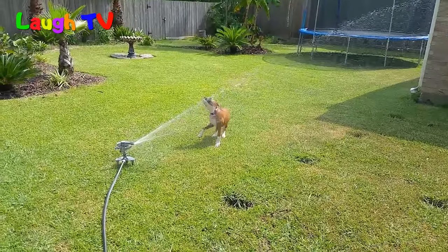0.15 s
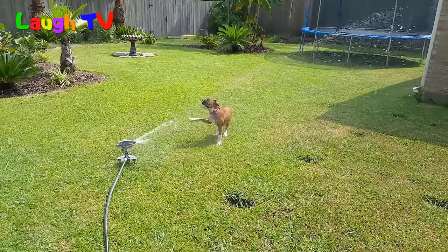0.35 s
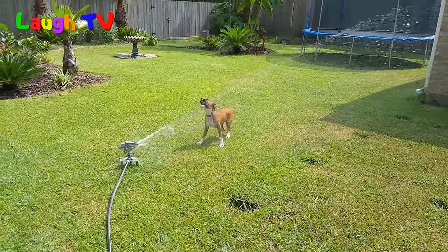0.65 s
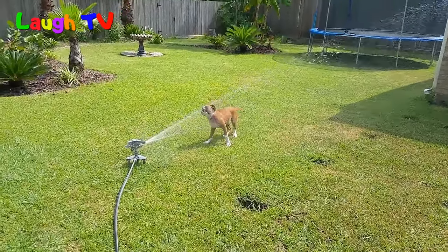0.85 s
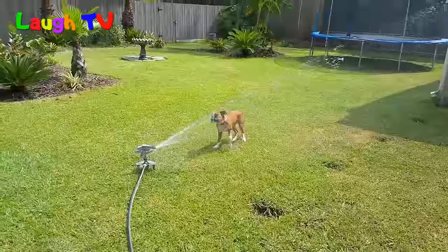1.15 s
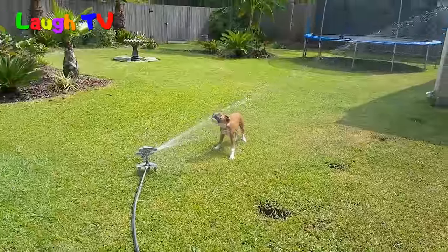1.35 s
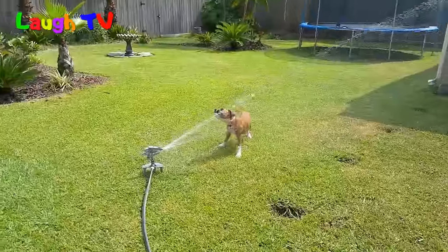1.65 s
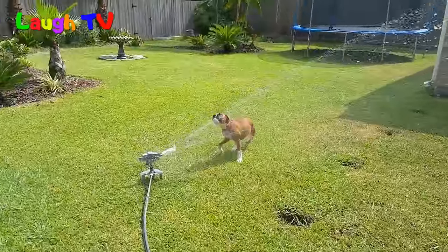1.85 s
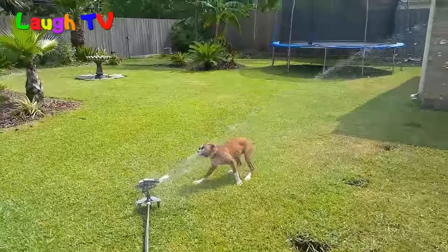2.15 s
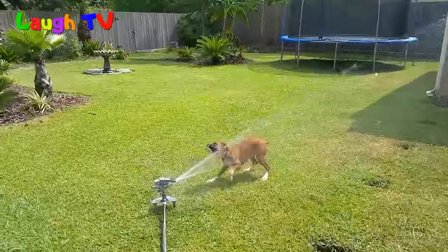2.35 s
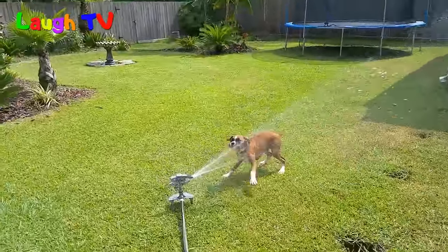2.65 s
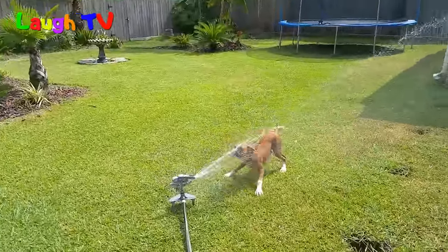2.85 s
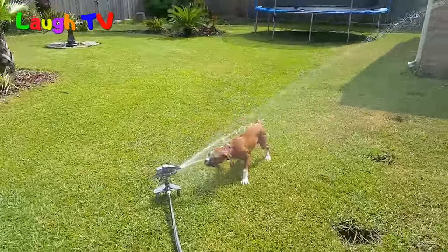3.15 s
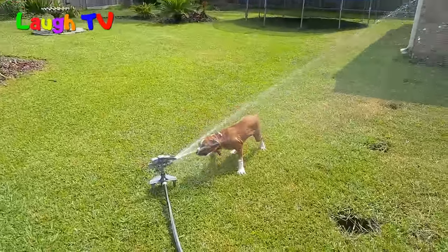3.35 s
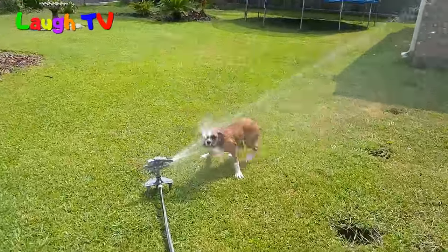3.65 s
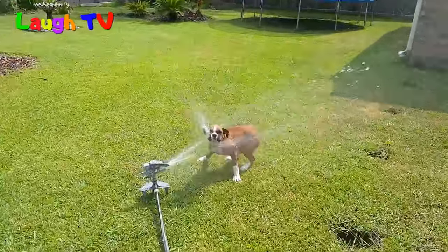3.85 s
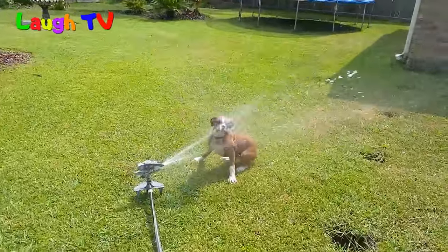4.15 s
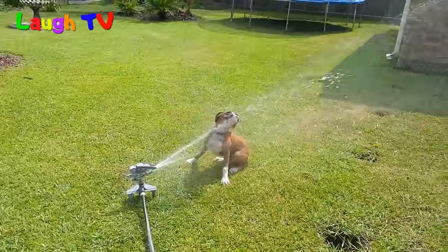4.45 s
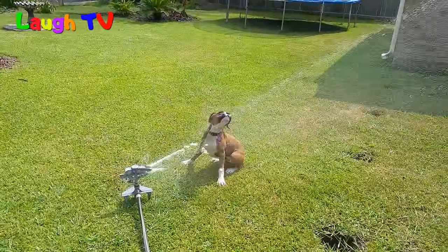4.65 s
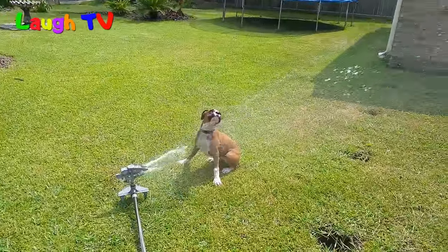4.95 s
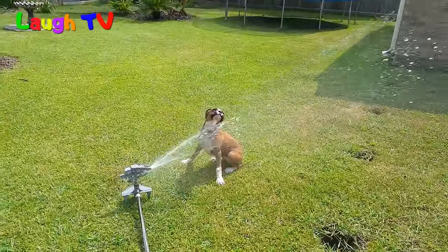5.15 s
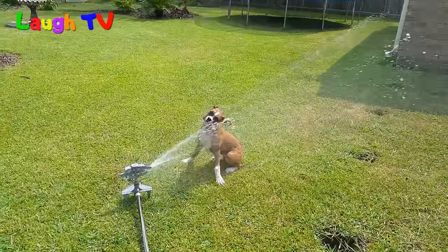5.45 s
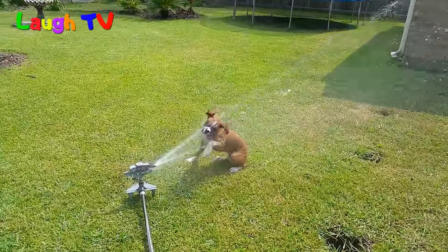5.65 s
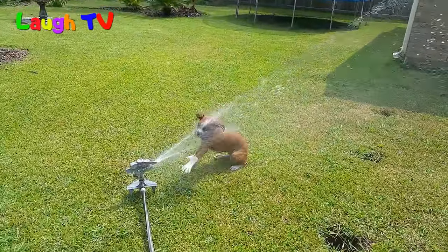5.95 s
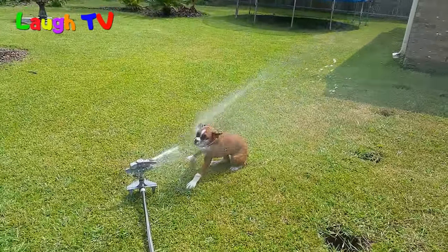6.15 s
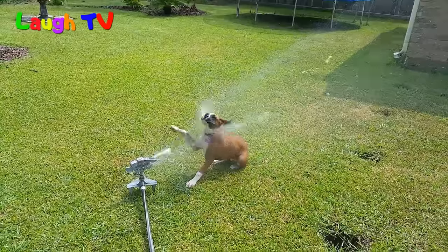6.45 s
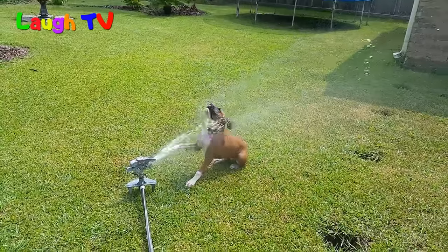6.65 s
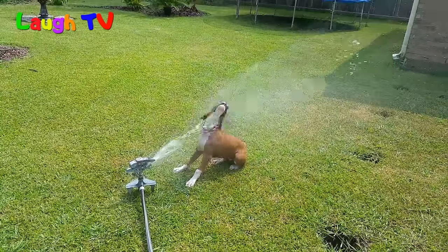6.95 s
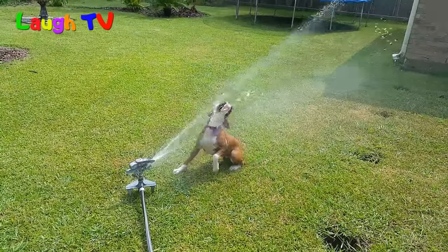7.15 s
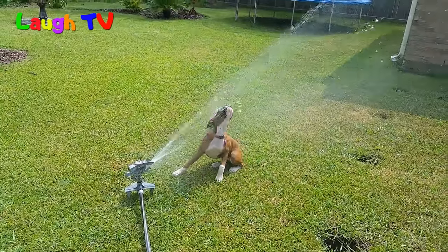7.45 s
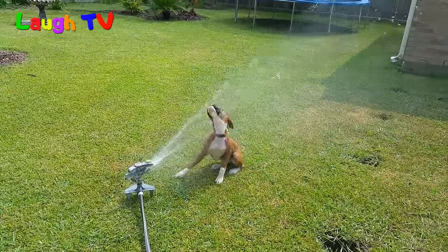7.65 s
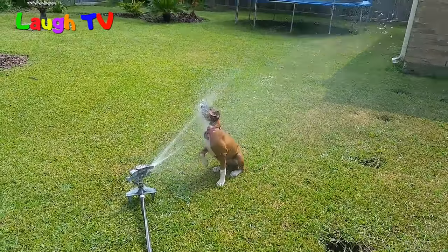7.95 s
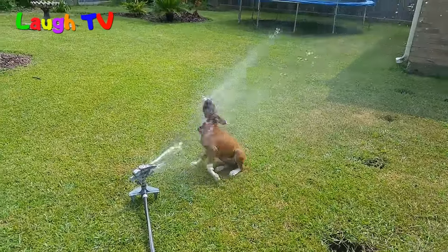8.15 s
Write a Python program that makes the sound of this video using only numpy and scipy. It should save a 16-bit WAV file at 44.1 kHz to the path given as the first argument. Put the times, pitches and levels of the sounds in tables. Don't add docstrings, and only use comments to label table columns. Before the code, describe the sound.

Steady sprinkler hiss with slow, regular bursts of coarse spray and a slight metallic ring, heard outdoors as the microphone moves nearer. One hard water drop pops against its right side. A dog biting the jet breaks it into sizzling drops with tiny wet snaps and gulps. In the second half the ticking becomes quick and softer over thicker, brighter hiss, above low rumble and weak wavering hum.

```python
import sys
import numpy as np
from scipy import signal
from scipy.fft import rfft, irfft
from scipy.io import wavfile
from scipy.ndimage import uniform_filter1d, map_coordinates

SR = 44100
rng = np.random.default_rng(int(sys.argv[2]) if len(sys.argv) > 2 else 0)


def generate_wav(sig):
    pcm = np.round(np.clip(np.atleast_2d(sig).T, -1, 1) * 32767).astype(np.int16)
    wavfile.write(sys.argv[1], SR, pcm)


def nominal_scale(level):
    x = np.asarray(level, float) / 20
    return 10 ** x


N = 365588
T = np.arange(N) / SR
HZ = np.maximum(np.fft.rfftfreq(N, 1 / SR), 1)

# columns start_s [s], pressure_step [full scale]
DROP_HITS = [
    (2.23877, .125),
    (2.2406, .95),
]


def unit(x):
    return x / np.sqrt(np.mean(x ** 2))


def colour(x, points):
    hz, db = np.transpose(points)
    gain_db = np.interp(np.log(HZ), np.log(hz), db, -70, -70)
    return unit(irfft(rfft(x) * nominal_scale(gain_db), N))


def ring(x, hz, width_hz):
    resonance = (1 + 1.3j * (HZ - hz) / width_hz) ** 2
    return unit(irfft(rfft(x) / resonance, N))


def walk(rate):
    hold = int(SR / rate)
    stairs = np.repeat(rng.standard_normal(N // hold + 1), hold)
    return 1.283 * uniform_filter1d(uniform_filter1d(stairs, hold), hold)[:N]


def noise_pair():
    return rng.standard_normal((2, N))


def droplets(spread_db, grain_db):
    drops = noise_pair() * nominal_scale(spread_db * rng.exponential(size=(2, N)))
    return drops * nominal_scale(grain_db * walk(400))


def curves(table):
    s, *columns = np.transpose(table)
    return [np.interp(T, s, column) for column in columns]


def bump(middle_s, half_s):
    return np.exp(-((T - middle_s) / half_s) ** 2)


def strokes():
    # columns stay_s [s in the jet], spray_db [dB]
    slow_swings = [(0.041, -34), (0.047, -33.5), (0.041, -32), (.035, -31), (.036, -31.5), (0.034, -30),
                   (.037, -30.5), (0.035, -28.5), (0.031, -29), (0.029, -29), (0.031, -27.5), (0.03, -29),
                   (.023, -27.5), (0.028, -26), (0.03, -27.5), (0.033, -27)]
    # columns peak_s [s], spray_db [dB]
    quick_strokes = [(4.979, -34), (5.128, -33.5), (5.28, -34), (5.43, -32.5), (5.58, -34.5), (5.736, -34),
                     (5.884, -35.5), (6.039, -37.5), (6.188, -34), (6.341, -33), (6.494, -33),
                     (6.649, -35.5), (6.799, -36), (6.952, -37), (7.105, -37), (7.249, -42), (7.412, -36.5),
                     (7.566, -38), (7.721, -34.5), (7.875, -35), (8.029, -39), (8.18, -37)]
    first_s, period_s = 0.1935, 0.30735
    quick_width_s = 0.029
    slow_mist_db, quick_mist_db = 3.5, -0.1
    slow, quick, mist, mask = np.zeros((4, N))

    for k, (stay, db) in enumerate(slow_swings):
        t = T - first_s - k * period_s
        core = np.interp(t, [-.003, .005, stay - .006, stay + 0.007], [0.00026, 0.83, 0.57, 0])
        approach = 0.06 * np.exp(np.minimum(t, 0) / 0.034)
        dripping = 0.077 * np.exp(-np.maximum(t - stay, 0) / 0.045)
        skirt = np.where(t < 0, approach, dripping)
        exit_flick = 0.038 * np.exp(-((t - stay - .025) / 0.006) ** 2)
        slow += nominal_scale(2 * db) * (core + skirt + exit_flick)
        mist_core = np.interp(t, [-.014, .006, stay - .004, stay + 0.028], [0.0017, 0.95, 0.62, 0])
        mist += nominal_scale(2 * slow_mist_db) * (mist_core + skirt)

    for peak_s, db in quick_strokes:
        t = T - peak_s
        quick += nominal_scale(2 * db) * np.interp(t / quick_width_s, [-.75, 0, .65], [0, 1.2, 0]) ** 1.4
        mist += nominal_scale(2 * quick_mist_db) * np.interp(t, [-0.055, -0.015, 0.013, 0.014], [0, 1, 1, 0])
        mask += np.interp(t, [.015, .024, .04], [0, 1, 0])
        mask += 0.23 * np.interp(t, [-.038, -.03, -.026], [0, 1, 0])
    return np.sqrt(slow), np.sqrt(quick), np.sqrt(mist), mask


def jet_hiss(close_db, mask):
    hiss_colour = [(1500, -24), (2500, -1), (3600, -3), (4500, -4), (5000, -1), (6000, -4), (6800, -5),
                   (8000, -21), (10000, -31)]
    level_db = -45.5 + 1.1 * close_db - 0.68 * mask + 0.51 * walk(12)
    return colour(droplets(1.2, 0.62), hiss_colour) * nominal_scale(level_db)


def jet_sizzle(broken_db, mask, slow, quick):
    sizzle_colour = [(4800, -19), (5600, -7), (6000, -3), (6130, -4), (6190, 1.5), (6250, -2), (6500, -1),
                     (7000, -6.5), (7800, -23)]
    steady = nominal_scale(-56 + broken_db - 3.5 * mask + 0.9 * walk(13))
    flow = np.hypot(steady, nominal_scale(-2.6) * quick + nominal_scale(-9.0) * slow)
    return colour(droplets(1.3, 1.8), sizzle_colour) * flow


def fine_mist(close_db, arm_mist):
    mist_colour = [(5000, -15), (7500, -0.5), (9000, -0.5), (11000, 1), (13000, -0.5), (14500, -2),
                   (16000, -2.5)]
    flow = np.hypot(nominal_scale(0.44 * walk(10)), nominal_scale(-0.5) * arm_mist)
    return colour(droplets(1.0, 0.91), mist_colour) * nominal_scale(-43 + close_db) * flow


def falling_patter(close_db):
    patter_colour = [(250, -12.5), (500, -3), (900, 0), (1500, 1), (2200, -0.5), (3000, -4.5), (4500, 1.5)]
    coat_db = 3 * bump(4.63, 0.23)
    level_db = -48 + 0.47 * close_db + coat_db + 1.1 * walk(8)
    return colour(droplets(1.75, 1.0), patter_colour) * nominal_scale(level_db)


def tearing_spray(slow, quick):
    spray_colour = [(1200, -24), (2200, -12), (3000, -11), (3600, -8.5), (4200, -3.5), (5000, 1.5),
                    (6000, -1), (6600, -4), (7500, -9.5), (9000, -9.5), (12000, -14)]
    surge = nominal_scale(0.16 + 1.46 * walk(90))
    return colour(droplets(2.2, 0.67), spray_colour) * np.hypot(slow, nominal_scale(-3) * quick) * surge


def ringing_head(head_db, slow, quick):
    body_hz, body_width_hz = 1648, 55
    flow_db, knock_db = -62.5, -24
    head = ring(noise_pair(), body_hz, body_width_hz) * nominal_scale(head_db)
    knocks = nominal_scale(knock_db) * uniform_filter1d(slow + quick, 900)
    return head * np.hypot(nominal_scale(flow_db + 2.7 * walk(7)), knocks)


def lawn(pair, delay_s):
    echo_gain, echo_top_hz = .36, 1700
    dull = signal.sosfilt(signal.butter(2, echo_top_hz, fs=SR, output="sos"), pair)
    return pair + echo_gain * np.array([np.interp(T - delay_s, T, wave) for wave in dull])


def sprinkler():
    # columns time_s [s], closeness_db [dB], jet broken up by dog and sweep broken_db [dB]
    steady_water = [(0, -0.5, 2), (.8, -.5, -2), (1.25, 0.4, -1), (2.1, 0, -4), (2.45, 0.5, 7),
                    (3.3, 0.5, 3.5), (3.75, 2.5, 7.5), (3.83, 5, 12.5), (4.35, 4, 6), (4.76, 1.8, 7),
                    (5.03, 3.5, 13.5), (5.8, 3.5, 12.5), (6.55, 4, 13.5), (6.74, 5.5, 14.5), (7.15, 3, 12),
                    (7.6, 3, 9.5), (8.29, 3.5, 8)]
    # columns time_s [s], echo_ms [ms], head_ring_db [dB]
    walking_closer = [
        (0, 1.87, 0),
        (1.0, 1.94, -2),
        (1.6, 2.24, 3.5),
        (8.3, 2.243, -8),
    ]
    close_db, broken_db = curves(steady_water)
    echo_ms, head_db = curves(walking_closer)
    slow, quick, arm_mist, mask = strokes()
    jet = jet_hiss(close_db, mask) + jet_sizzle(broken_db, mask, slow, quick)
    mist = fine_mist(close_db, arm_mist)
    near_grass = falling_patter(close_db) + tearing_spray(slow, quick)
    return jet + mist + lawn(near_grass, echo_ms / 1000) + ringing_head(head_db, slow, quick)


def dog():
    snaps = [(2.436, 0.042, 280, 200, -44), (2.705, 0.02, 8250, 250, -34.5), (2.79, .012, 6700, 200, -55),
             (3.82, .03, 860, 90, -46), (4.279, 0.018, 1100, 400, -46), (4.402, 0.028, 1300, 120, -46),
             (6.554, 0.06, 820, 150, -51), (6.711, 0.079, 823, 130, -42.5), (6.785, .02, 4500, 150, -46),
             (7.03, 0.054, 400, 250, -51), (7.212, 0.083, 400, 300, -46)]
    out = np.zeros((2, N))
    for s, length, hz, width_hz, db in snaps:
        shape = np.interp(T - s, [-.004, .004, 0.64 * length, length + .01], [0.0099, 1, 0.85, 0.019])
        out += nominal_scale(db) * shape * ring(noise_pair(), hz, width_hz)
    return out


def drop_on_port():
    low_cut_hz, low_cut_q, vent_hz = 90.7, .68, 13.4
    rise_s = .00014
    push = sum(size * np.clip((T - s) / rise_s + .5, 0, 1) for s, size in DROP_HITS)
    w = 2 * np.pi * low_cut_hz
    low_cut = signal.bilinear([1, 0, 0], [1, w / low_cut_q, w * w], SR)
    cut = signal.lfilter(*low_cut, push)
    vented = signal.lfilter(*signal.butter(1, vent_hz, "high", fs=SR), cut)
    return vented * np.array([[0], [1]])


def yard():
    rumble_colour = [(20, -14), (35, -7.5), (60, -3), (100, 0), (140, 0), (200, -4.5), (300, -9.5),
                     (500, -11.5), (800, -16.5)]
    hum_lines = (119.3, 135, 241)
    # columns middle_s [s], half_width_s [s], pitch_hz [Hz], level_db [dB]
    hum_swells = [(0, .15, 119.3, -49), (1.4, 0.22, 119.3, -55), (2.55, 0.34, 119.3, -48),
                  (5.35, .2, 119.3, -53), (6.8, 0.39, 119.3, -55), (0, .15, 135, -49), (3.7, .25, 135, -59),
                  (5.65, 0.33, 135, -49), (6.45, 0.41, 135, -51.5), (7.2, .15, 135, -52),
                  (7.73, 0.11, 135, -55), (.27, .2, 241, -52), (1.5, 0.27, 241, -57.5),
                  (2.4, 0.21, 241, -56.5), (4.6, .12, 241, -57.5), (5.2, 0.28, 241, -57),
                  (6.14, 0.19, 241, -58), (7.75, .25, 241, -57.5)]
    rumble_db = -50 + 4 * np.exp(-T / 0.17)
    out = colour(noise_pair(), rumble_colour) * nominal_scale(rumble_db + 0.61 * walk(6))
    port_phase = np.array([[0], [np.pi / 2]])
    for line_hz in hum_lines:
        level = nominal_scale(-67.5)
        for middle_s, half_s, hz, db in hum_swells:
            if abs(hz / line_hz - 1) < 1 / 16:
                level = level + nominal_scale(db) * bump(middle_s, half_s)
        wavering_hz = line_hz * (1 + 0.006 * walk(3))
        out = out + level * np.sin(2 * np.pi * np.cumsum(wavering_hz) / SR + port_phase)
    return out


def late(x, delay_s):
    return map_coordinates(x, [np.arange(N) - delay_s * SR], order=4, mode="nearest")


def ports(pair):
    # columns pitch_hz [Hz], gain_db [dB], likeness [0-1], lag [radians]
    right_port = [(98, -0.5, 1, -0.5), (720, 0.5, 0.52, 1), (1300, 6.5, .65, 0.02), (2426, 4, 0.59, 2),
                  (2880, 2.5, 0.62, 3.5), (3290, -2, 0.29, 3), (4240, 2, 0, 1.1), (4960, 6.5, .55, 2.0),
                  (6190, 10, 0.8, 2), (7270, 7, 0.18, 4.5), (8180, -3, 0, 3.5), (9550, 3.5, 0.66, 5.0),
                  (11200, -3.5, 0.02, 10), (12600, 7, 0.7, 12.5), (15500, -0.5, .2, 16.5)]
    # columns time_s [s], extra lag at the right port lag_us [microseconds]
    camera_swing = [
        (0, 23),
        (2.4, -11),
        (2.8, -57),
        (3.2, -44),
        (3.6, -25),
        (4.8, 0),
        (8.3, -10),
    ]
    hz, db, like, lag = np.transpose(right_port)
    like = np.clip(np.interp(HZ, hz, like), 0, 1)
    blend = like * rfft(pair[0]) + np.sqrt(1 - like ** 2) * rfft(pair[1])
    lagging = np.exp(-1j * np.interp(HZ, hz, lag))
    right = irfft(blend * nominal_scale(np.interp(HZ, hz, db)) * lagging, N)
    return np.array([pair[0], late(right, curves(camera_swing)[0] / 1e6)])


def scene():
    duck_db, hold_s, release_s = -3, 0.77, 0.41
    since_seal = T - DROP_HITS[-1][0]
    duck = np.interp(since_seal, [0, .01, hold_s, hold_s + release_s], [0, 1, 1, 0])
    air = ports(sprinkler() + yard() + dog())
    return air * nominal_scale(duck_db * duck) + drop_on_port()


def band_limit(x):
    return signal.sosfilt(signal.butter(12, 15800, fs=SR, output="sos"), x)


def record(dry):
    return band_limit(dry)


dry = scene()
out = record(dry)
generate_wav(out)
```